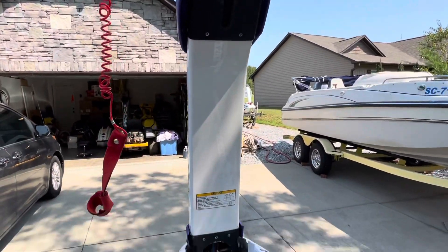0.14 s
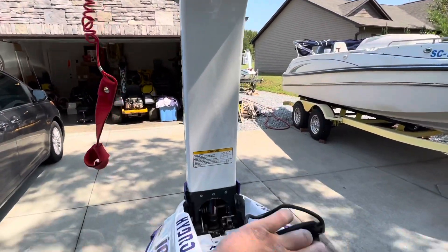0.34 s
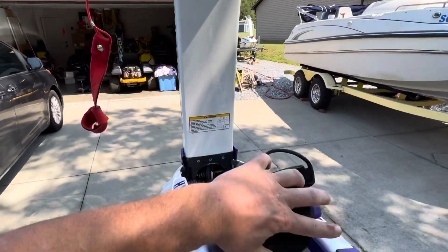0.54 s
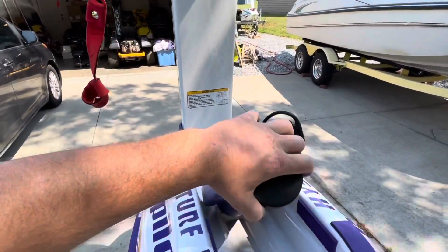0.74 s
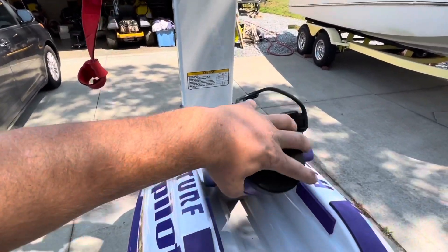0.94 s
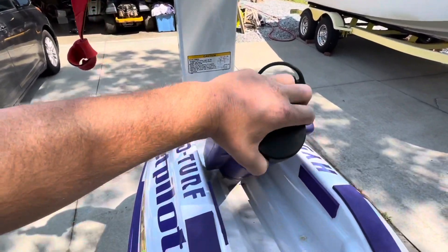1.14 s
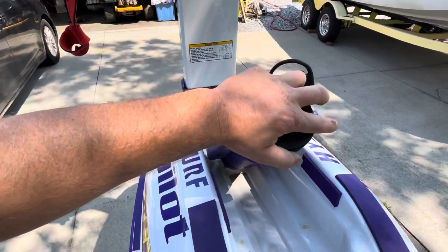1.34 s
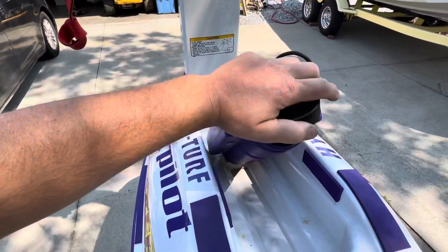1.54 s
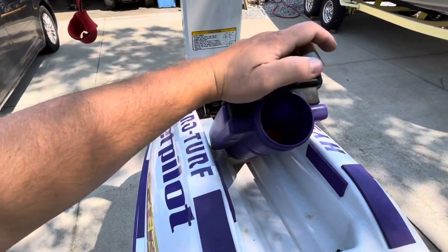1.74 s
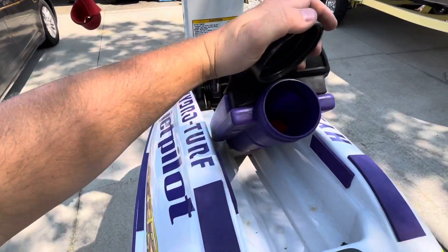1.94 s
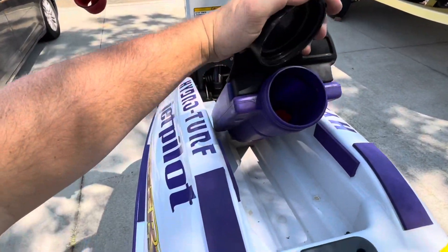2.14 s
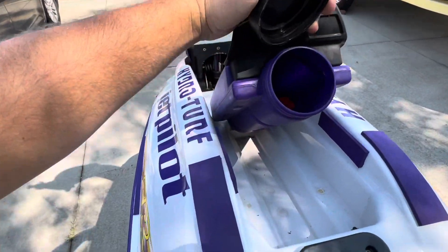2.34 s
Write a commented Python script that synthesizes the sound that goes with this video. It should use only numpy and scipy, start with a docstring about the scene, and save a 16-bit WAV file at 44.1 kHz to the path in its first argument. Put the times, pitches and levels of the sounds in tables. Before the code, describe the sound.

Hollow plastic knocks and rubbing from a cap twisted off a tube, over faint insect hiss

```python
"""A plastic screw cap knocks in its thread, over a high hiss, likely insects, a low rumble and a faint rub.
It is worked loose from a storage tube on a moulded hull and lifted off, outdoors.
Noise shaped by spectra makes the hiss, rumble and rubbing; decaying modes ring the cap, tube and hull.
Each knock crosses the shell as a dispersive bending wave, treble first and bass last."""
import sys
import numpy as np
from scipy import signal
from scipy.fft import rfft, irfft
from scipy.io import wavfile

SR = 44100
rng = np.random.default_rng(int(sys.argv[2]) if len(sys.argv) > 2 else 0)


def to_wav(s):
    """Save 16-bit WAV."""
    ch = np.atleast_2d(s).T  # columns
    pcm = np.round(np.clip(ch, -1, 1) * 32767)  # PCM
    wavfile.write(sys.argv[1], SR, pcm.astype(np.int16))


N = 105840
RING_SIZE = 16384   # samples in one knock response


def from_db(db):
    """Level is logarithmic: 20 dB is a factor of ten in amplitude."""
    return 10 ** (np.asarray(db) / 20)


def rms_one(x):
    """Mean-square normalisation: the result has unit power."""
    return x / np.sqrt(np.mean(x ** 2) + 1e-20)


def at_hz(points, hz):
    """Interpolation along a logarithmic frequency axis, on which octaves are equal steps."""
    f, value = np.transpose(points)
    return np.interp(np.log(hz + 1), np.log(f), value)


def pan(db):
    """Interchannel level difference: half is added on the left, half taken from the right."""
    return from_db(np.array([np.atleast_1d(db), -np.atleast_1d(db)]) / 2)


def coloured(x, spectrum):
    """Spectral shaping: a signal is weighted by frequency, then brought to unit power."""
    gain = from_db(at_hz(spectrum, np.fft.rfftfreq(N, 1 / SR)))
    return rms_one(irfft(rfft(x) * gain, N))


def wavering_tone(hz, width_hz):
    """Narrow-band noise: a double resonance turns noise into a wavering tone of unit power."""
    f = np.fft.rfftfreq(N, 1 / SR)
    resonance = 1 / (1 + 2j * (f - hz) / width_hz) ** 2
    return rms_one(irfft(rfft(rng.standard_normal(N)) * resonance, N))


def ringing(modes):
    """Modal superposition: the frequency response of a sum of exponentially decaying cosines."""
    t = np.arange(RING_SIZE) / SR
    return rfft(sum(from_db(db - 60 * t / t60) * np.cos(2 * np.pi * hz * t) for hz, db, t60 in modes))


def tail(t60, channels):
    """Diffuse reverberation: the frequency response of decaying noise, of unit energy per channel on average."""
    t = np.arange(RING_SIZE) / SR
    reflections = rng.standard_normal((channels, RING_SIZE)) * from_db(-60 * t / t60)
    return rfft(rms_one(reflections)) / np.sqrt(RING_SIZE)


# Spectrum of the insect chorus. Each row: frequency in Hz, relative level in dB per Hz.
CHORUS_SPECTRUM = [(2500, -32.5), (4000, -13.5), (5150, -4), (5650, -7.5), (5920, -4.5), (6500, 2),
                   (6850, -2.5), (7080, -0.5), (7350, -11), (7750, -5.5), (8050, -2.5), (8800, -7),
                   (9800, -18.5), (11000, -39.5)]
# Chorus level in dB, for the left and then the right channel.
CHORUS_DB = [-49.5, -57]
# Narrow tones in the chorus. Each row: frequency in Hz, level in dB before panning.
INSECT_TONES = [(5895, -67), (5960, -67), (6115, -69), (6239, -75), (6358, -75), (6708, -77.5),
                (7117, -67.5), (8086, -71)]
TONE_WIDTH_HZ, TONE_PAN_DB = 34, 18.5   # width of each resonance stage; left over right
THROB_HZ, THROB_DEPTH = 27.4, 0.04      # depth is the rms change of amplitude


def insects():
    """Amplitude modulation: a high chorus with narrow tones, mostly on the left, throbs faintly."""
    chorus = coloured(rng.standard_normal((2, N)), CHORUS_SPECTRUM) * from_db(CHORUS_DB)[:, None]
    tones = np.zeros((2, N))
    for hz, db in INSECT_TONES:
        pair = np.array([wavering_tone(hz, TONE_WIDTH_HZ), wavering_tone(hz, TONE_WIDTH_HZ)])
        tones += from_db(db) * pair
    throb = 1 + THROB_DEPTH * wavering_tone(THROB_HZ, width_hz=3.2)
    return (chorus + tones * pan(TONE_PAN_DB)) * throb


# Spectrum of the distant rumble. Each row: frequency in Hz, relative level in dB per Hz.
RUMBLE_SPECTRUM = [(18, -60), (30, -27), (38, 0), (50, -13), (66, -3.5), (80, -1), (115, -4.5),
                   (160, -15.5), (200, -10.5), (260, -17.5), (400, -38), (1000, -81)]
# Spectrum of the open air. Each row: frequency in Hz, relative level in dB per Hz.
AIR_SPECTRUM = [(100, -49), (300, -11), (600, -5), (1200, -7.5), (2300, -18.5), (3100, -15), (4500, -5),
                (8500, -40), (10000, -36), (16000, -65)]
# Spectrum of the thin top hiss. Each row: frequency in Hz, relative level in dB per Hz.
TOP_HISS_SPECTRUM = [(6000, -17), (9400, 2), (10400, -9), (11500, 13), (14000, 8.5), (15000, -11)]
RUMBLE_DB, AIR_DB, TOP_HISS_DB = -53.5, -66, -74.5
RUMBLE_PAN_DB, RUMBLE_APART_DB = 2.8, -5   # left over right; independent noise against shared noise
HUM_HZ, HUM_WIDTH_HZ, HUM_DB = 67.8, 42, -52


def outdoors():
    """Partial coherence: the rumble shares noise between channels, the air none, the top hiss all of it."""
    shared = rng.standard_normal(N)
    apart = from_db(RUMBLE_APART_DB) * rng.standard_normal((2, N))
    rumble = from_db(RUMBLE_DB) * coloured(shared + apart, RUMBLE_SPECTRUM)
    hum = from_db(HUM_DB) * wavering_tone(HUM_HZ, HUM_WIDTH_HZ)
    air = from_db(AIR_DB) * coloured(rng.standard_normal((2, N)), AIR_SPECTRUM)
    top_hiss = from_db(TOP_HISS_DB) * coloured(rng.standard_normal(N), TOP_HISS_SPECTRUM)
    return pan(RUMBLE_PAN_DB) * (rumble + hum) + air + top_hiss


# Stereo balance of the cap's sounds. Each row: frequency in Hz, left minus right in dB.
CAP_BALANCE = [(100, 1.5), (250, 2.5), (420, 7), (700, -4), (1100, 3), (2000, 0), (5000, 0.5)]


def cap_balance(f):
    """Frequency-dependent panning: the two channel gains at each frequency."""
    return pan(at_hz(CAP_BALANCE, f))


# Rubbing of cap and hand over time. Each row: time in seconds, level in dB.
RUB_LEVEL = [(0, -51.5), (.15, -60.5), (.21, -61), (.34, -46), (.41, -47.5), (.47, -59.5), (.66, -51.5),
             (.72, -46.5), (.81, -48), (.85, -57.5), (.93, -60), (1.05, -50), (1.16, -45), (1.24, -38),
             (1.32, -47), (1.37, -50), (1.48, -68), (1.54, -44), (1.60, -54.5), (1.67, -51.5), (1.85, -67)]
# Colour the shell gives the rubbing. Each row: frequency in Hz, relative level in dB.
RUB_SPECTRUM = [(50, 9), (110, 4), (250, 6), (430, 5.5), (560, -5), (740, 3), (900, -4.5), (1100, -3.5),
                (1500, -12.5), (3000, -16.5), (5000, -23), (9000, -70)]
# Slides of the thread. Each row: centre in seconds, half-length (Gaussian deviation) in seconds, level in dB.
SLIDES = [(1.1, 0.0085, -51), (1.252, 0.0069, -48)]
# Colour of the sliding hiss. Each row: frequency in Hz, relative level in dB.
SLIDE_SPECTRUM = [(500, -5), (1600, -11), (2900, 13), (4200, -12), (9000, -44), (13000, -6), (16000, -30)]
RUB_GRAINS_PER_S, RUB_SPREAD_DB = 500, 2   # mean rate of slips; scale of their exponential spread
RUB_APART_DB = 1.5                         # independent noise against the shared slips


def rubbing():
    """Stick-slip friction: random tiny slips of the turning cap, with brief hisses as the thread slides."""
    t = np.arange(N) / SR
    slip_happens = rng.random(N) < RUB_GRAINS_PER_S / SR
    slip_size = from_db(RUB_SPREAD_DB * np.minimum(rng.exponential(1, N), 4))
    slips = slip_happens * rng.choice([-1, 1], N) * slip_size
    apart = from_db(RUB_APART_DB) * rng.standard_normal((2, N))
    grain = coloured(rms_one(slips) + apart, RUB_SPECTRUM)
    grain = irfft(rfft(grain) * cap_balance(np.fft.rfftfreq(N, 1 / SR)), N)
    rub = grain * from_db(np.interp(t, *np.transpose(RUB_LEVEL)))
    slide = sum(from_db(db) * np.exp(-.5 * ((t - s) / half) ** 2) for s, half, db in SLIDES)
    return rub + slide * coloured(rng.standard_normal(N), SLIDE_SPECTRUM)


# Knocks of the cap. Each row: start in seconds, level in dB, bass in dB, treble in dB, ring of the cap in dB,
# ring of the tube in dB, favoured frequency in Hz, delay of the rebound in seconds.
KNOCKS = [(0.059, -32, 12, -31, -17, -9, 402, 0.0027), (0.125, -32.5, 9.5, -19, -19, -18, 686, 0.0031),
          (0.142, -31, 7.5, -5, -2, -18, 1100, 0.0022), (.155, -33.5, 8.5, 5, -1, -8, 620, 0.0029),
          (.2325, -19, 2.5, -21, -15, -22, 525, .0018), (0.3669, -16, -4, -5.5, -4.5, -24, 400, .0017),
          (0.399, -29.5, 10, -6, -24, -26, 226, 0.0024), (0.507, -15.5, 4, 6.5, -2.5, -27, 1020, 0.0024),
          (.5165, -19.5, 7, -1, -10, -24, 1900, 0.0027), (0.532, -14.5, 2, -3.5, -3.5, -12, 1080, .0045),
          (0.6122, -14.5, -2, -2.5, -2.5, -25, 775, 0.0033), (0.685, -32.5, 0, 1, -16, -20, 1120, .004),
          (0.71, -26, 2, -29.5, -11.5, -26, 606, 0.0028), (0.807, -36.5, 7, 0, -7, -20, 422, 0.0036),
          (.870, -27, 8.5, -5, -11, -16, 430, 0.0018), (.8755, -26, -3, 3, 2, -26, 1030, 0.0022),
          (0.957, -35, 15, -36, -28, -26, 390, 0.0024), (0.9833, -17.5, 4.5, 0.5, -5, -19, 1000, 0.0021),
          (1.066, -38, 13, 1, -18, -5, 720, 0.0032), (1.12, -30, 6.5, 4, -30, -1.5, 333, 0.0048),
          (1.172, -32, 14, 11.5, -35, -1, 740, 0.0013), (1.196, -32, 0, -6, 6, -18, 1400, 0.00323),
          (1.2012, -15.5, 13, -5.5, -17, -18, 282, 0.00346), (1.243, -34, 4, -28, 10, -12, 1500, 0.0024),
          (1.2497, -19.5, 8, 3.5, -8.5, -23, 700, 0.00201), (1.2886, -21, 13, 0.5, -6, -20, 312, 0.00166),
          (1.352, -35.5, 9, -22, -6, -14, 308, 0.0037), (1.386, -25, 6, -37, -19, -20, 135, .0025),
          (1.441, -27.5, 5.5, 8.5, -3.5, 5.5, 222, 0.0024), (1.557, -16, 1.5, -4, -14, 0, 1620, 0.003),
          (1.757, -20.5, 13, 3.5, -13, -30, 271, 0.0026), (1.786, -39, -2, 0, -7, -20, 1300, 0.0031),
          (2.042, -39.5, 19.5, -11, -42, -5.5, 247, 0.0047), (2.2506, -41.5, 22, 2.5, -37, -7, 250, 0.0023)]
# Colour shared by all knocks. Each row: frequency in Hz, relative level in dB.
KNOCK_SPECTRUM = [(30, -52), (60, 7.5), (100, -6), (160, -1.5), (300, 0), (450, 2.5), (750, -0.5),
                  (1150, -4.5), (1500, -9.5), (2000, -12.5), (3000, -25), (5000, -30), (12000, -43.5)]
# Modes of the cap. Each row: frequency in Hz, relative level in dB, 60 dB decay time in seconds.
CAP_MODES = [(312, -14.5, 0.042), (409, -26.5, 0.2), (660, -28.5, 0.093), (721, -8.5, 0.046),
             (920, -11, 0.021), (1101, -4.5, 0.049), (1240, -66, 0.071), (1720, -17.5, 0.034),
             (1866, -26, 0.11), (1940, -47, 0.085), (2540, -20.5, 0.14), (3040, 6, 0.0084)]
# Modes of the hollow tube. Each row: frequency in Hz, relative level in dB, 60 dB decay time in seconds.
TUBE_MODES = [(175, -40, 0.11), (206, -27, 0.073), (235, -20, 0.16), (246, -46, 0.067)]
BASS_HZ, MIDDLE_HZ, BRIGHT_HZ, TREBLE_HZ = 238, 560, 996, 2240   # hinges of each knock's colour
BEND_DELAY_S = .0046   # travel time of a 1 kHz bending wave; goes with 1 / sqrt(frequency)
FRONT_HZ = 4170        # the wave front, whose travel time is taken off all delays
RIGHT_LAG_S = .00005
# Dense reflections inside the shell; below SCATTER_ABOVE_HZ it has too few modes to scatter.
SCATTER_DB, SCATTER_T60_S, SCATTER_APART_DB, SCATTER_ABOVE_HZ = -3.5, 0.072, -7.5, 170
YARD_DB, YARD_T60_S = -12.5, 0.11
# Each point of contact favours one region of the shell's resonances.
FOCUS_DB, FOCUS_OCTAVES = 6.5, 0.16
# The faces grate for a moment as they meet.
CHATTER_DB, CHATTER_T60_S, CHATTER_ABOVE_HZ = 0, 0.024, 610
# The cap touches twice; the second touch carries little bass.
REBOUND_DB, REBOUND_ABOVE_HZ = -5, 450


def knocks():
    """Bending-wave dispersion: each grating contact rings cap and tube, its bass delayed through the shell."""
    f = np.fft.rfftfreq(RING_SIZE, 1 / SR)
    colour = from_db(at_hz(KNOCK_SPECTRUM, f))
    # Phase in turns; its slope over frequency is the group delay.
    turns = BEND_DELAY_S * np.sqrt(1000) * (2 * np.sqrt(f) - f / np.sqrt(FRONT_HZ))
    lag_turns = np.outer([0, 1], f * RIGHT_LAG_S)
    path = colour * cap_balance(f) * np.exp(-2j * np.pi * (turns + lag_turns))
    cap, tube = ringing(CAP_MODES), ringing(TUBE_MODES)
    push = 1 / (1 + 1j * f / CHATTER_ABOVE_HZ)
    scatter_gain = from_db(SCATTER_DB) * f / np.hypot(f, SCATTER_ABOVE_HZ)
    rebound_gain = from_db(REBOUND_DB) * f ** 2 / (f ** 2 + REBOUND_ABOVE_HZ ** 2)
    fade = np.minimum(1, np.linspace(2, 0, RING_SIZE))   # only the second half fades
    out = np.zeros((2, N + RING_SIZE))
    for s, db, bass_db, treble_db, cap_db, tube_db, focus_hz, rebound_s in KNOCKS:
        chatter = from_db(CHATTER_DB) * (1 - push) ** 2 * tail(CHATTER_T60_S, channels=1)
        scatter = tail(SCATTER_T60_S, channels=1)
        scatter = scatter + from_db(SCATTER_APART_DB) * tail(SCATTER_T60_S, channels=2)
        yard = from_db(YARD_DB) * tail(YARD_T60_S, channels=2)
        pulse = push + chatter + scatter_gain * scatter + yard
        rings = from_db(cap_db) * cap + from_db(tube_db) * tube
        rebound = rebound_gain * np.exp(-2j * np.pi * f * rebound_s)
        body = (1 + rebound) * (pulse / colour.mean() + rings)
        touch_db = at_hz([(BASS_HZ, bass_db), (MIDDLE_HZ, 0), (BRIGHT_HZ, 0), (TREBLE_HZ, treble_db)], f)
        octaves_off = np.log2((f + 1) / focus_hz)
        focus = 1 + (from_db(FOCUS_DB) - 1) / (1 + 1j * octaves_off / FOCUS_OCTAVES)
        start = max(int(s * SR), 0)
        knock = irfft(from_db(db + touch_db) * focus * body * path)
        out[:, start:start + RING_SIZE] += knock * fade
    return out[:, :N]


# Shoves of the hand on the hull. Each row: start in seconds, level in dB.
THUMPS = [(0.186, -44), (.405, -32), (0.518, -26.5), (0.627, -37), (1.015, -40), (1.268, -23.5),
          (1.294, -36.5), (1.401, -31.5), (1.656, -39.5)]
# Lowest modes of the hull. Each row: frequency in Hz, relative level in dB, 60 dB decay time in seconds.
HULL_MODES = [(70, -17, 0.12), (102, -9, 0.18), (123.3, 0.5, 0.085), (181, -8, 0.14)]
THUMP_RISE_S, THUMP_PAN_DB = 0.0025, 2   # time constant of the swell; left over right


def thumps():
    """Modal excitation by a soft force: shoves swell briefly in the lowest modes of the hull."""
    out = np.zeros(N)
    for s, db in THUMPS:
        t = np.maximum(np.arange(N) / SR - s, 0)
        swell = 1 - np.exp(-t / THUMP_RISE_S)
        for hz, mode_db, t60 in HULL_MODES:
            decay_db = -60 * np.minimum(t / t60, 2)
            out += swell * from_db(db + mode_db + decay_db) * np.sin(2 * np.pi * hz * t)
    return out * pan(THUMP_PAN_DB)


def scene():
    """Superposition: the yard behind and the cap close by add linearly."""
    return insects() + outdoors() + rubbing() + knocks() + thumps()


LOW_CUT_HZ, CUTOFF_HZ = 90, 15000


def record(dry):
    """Band limiting: the deepest bass is rolled off and the top is cut steeply."""
    low_cut = signal.butter(2, LOW_CUT_HZ, "high", fs=SR, output="sos")
    top_cut = signal.ellip(10, .05, 60, CUTOFF_HZ, fs=SR, output="sos")
    thinned = signal.sosfilt(low_cut, dry)
    return signal.sosfiltfilt(top_cut, thinned)   # run both ways, so without phase shift


dry = scene()
out = record(dry)
to_wav(out)
```